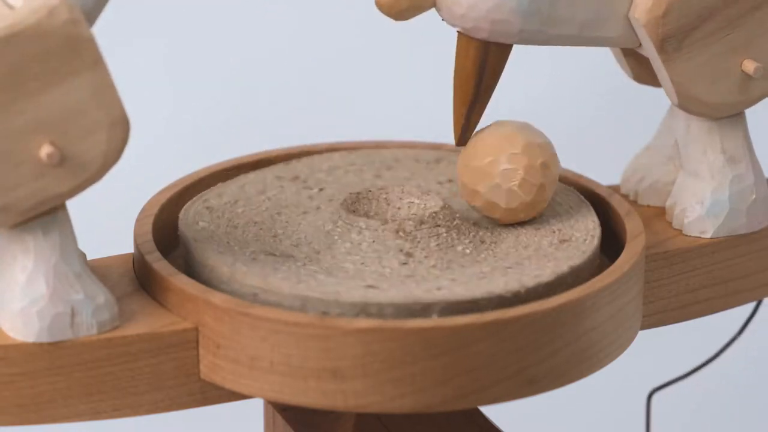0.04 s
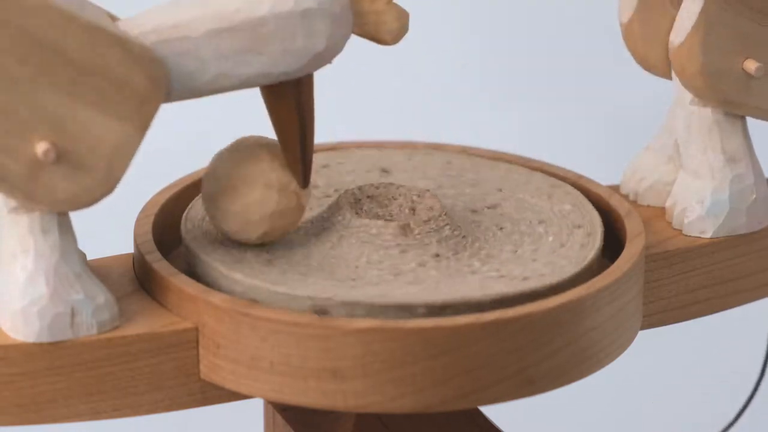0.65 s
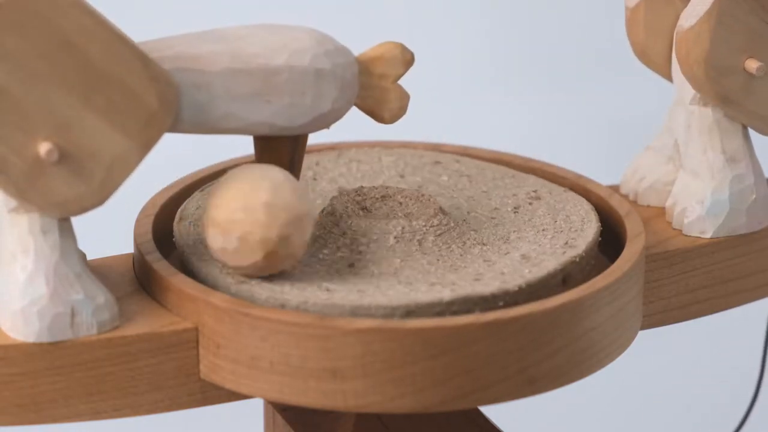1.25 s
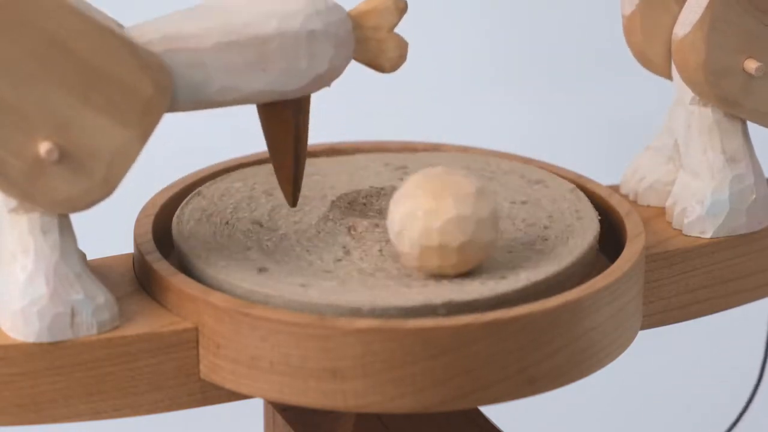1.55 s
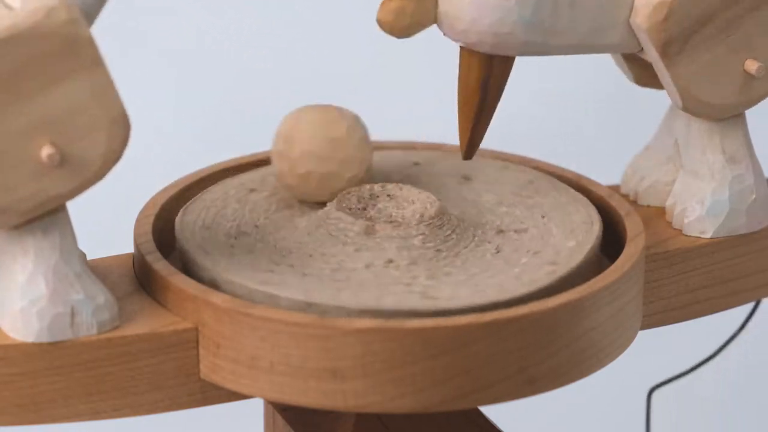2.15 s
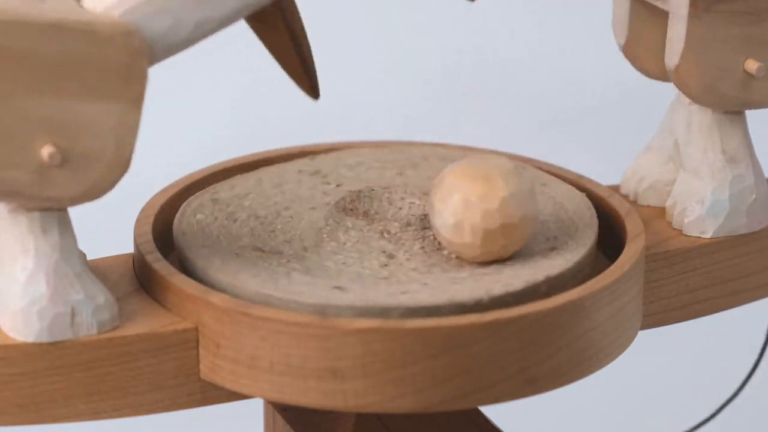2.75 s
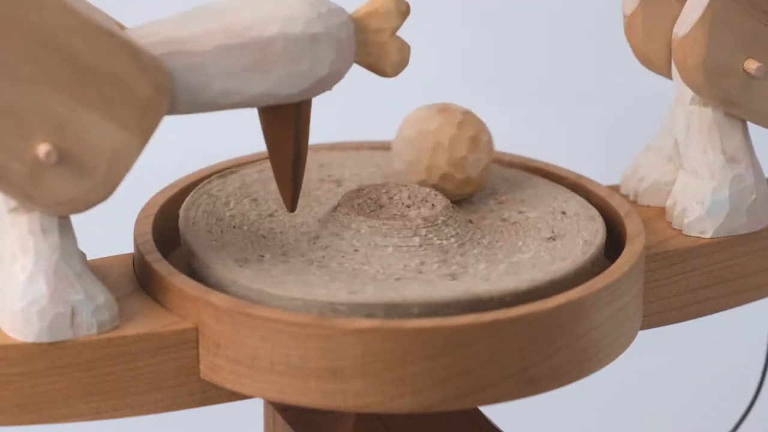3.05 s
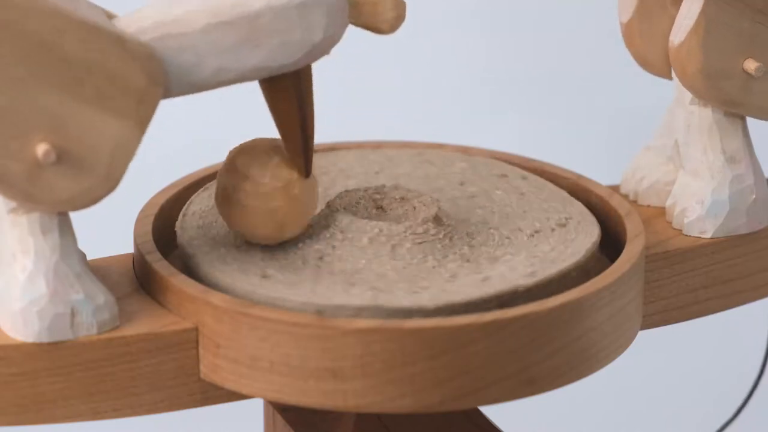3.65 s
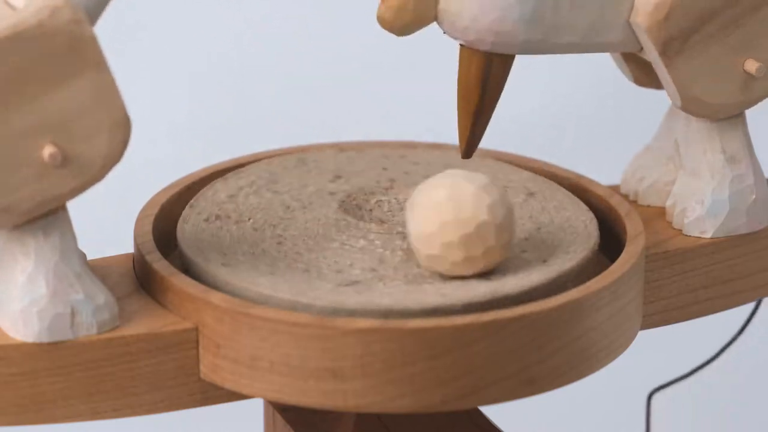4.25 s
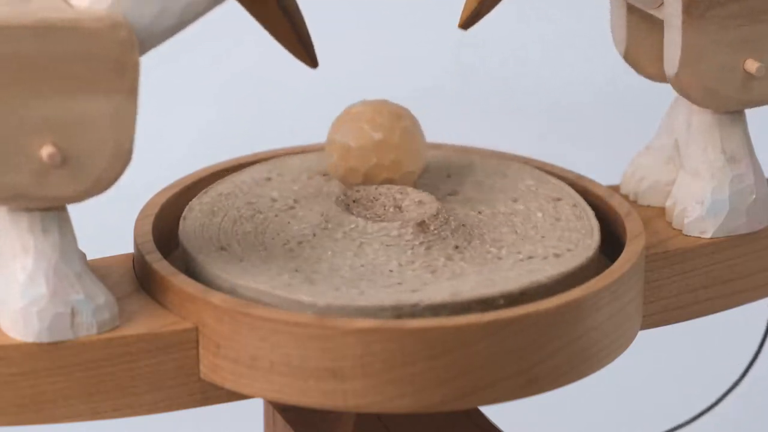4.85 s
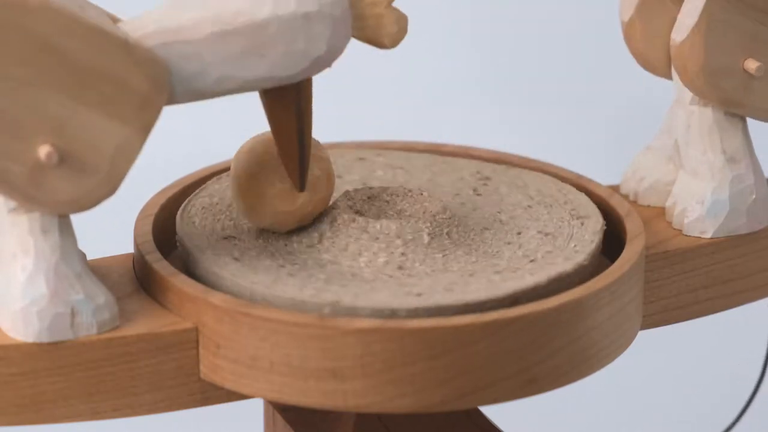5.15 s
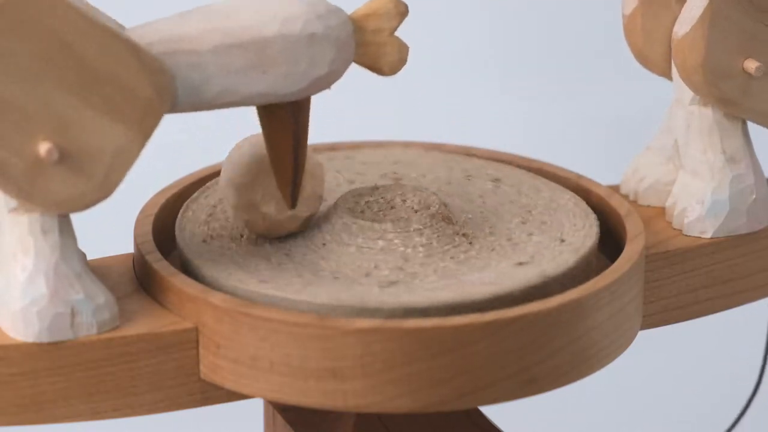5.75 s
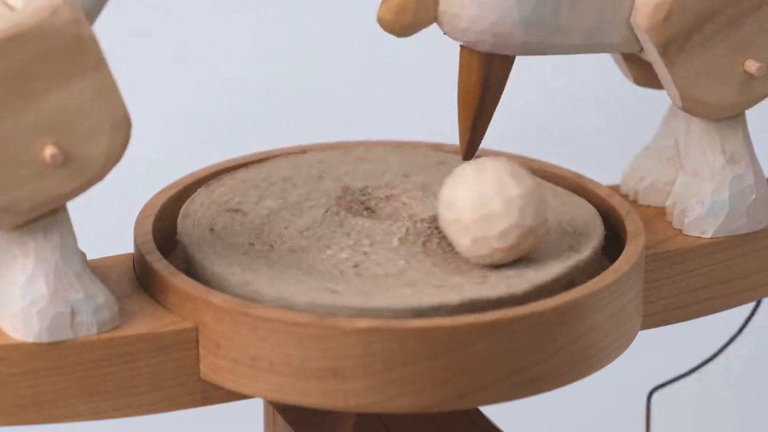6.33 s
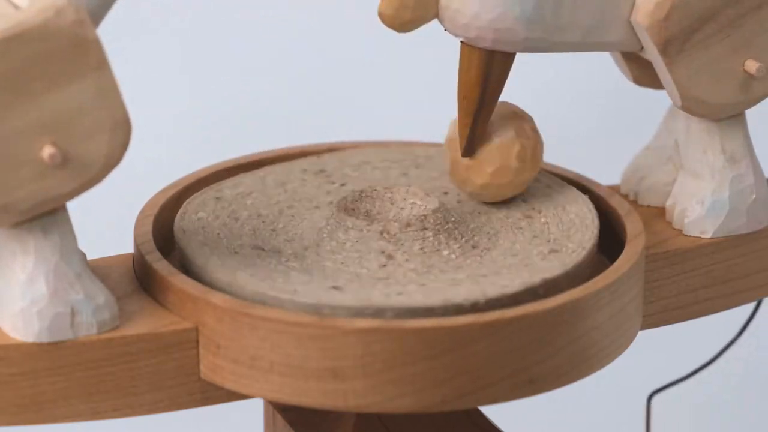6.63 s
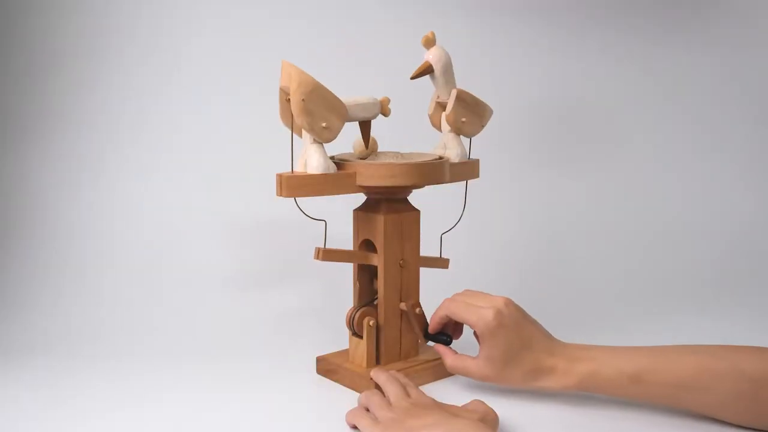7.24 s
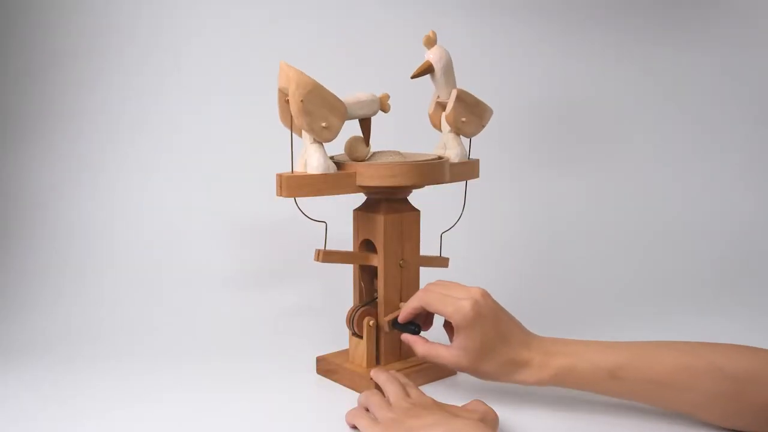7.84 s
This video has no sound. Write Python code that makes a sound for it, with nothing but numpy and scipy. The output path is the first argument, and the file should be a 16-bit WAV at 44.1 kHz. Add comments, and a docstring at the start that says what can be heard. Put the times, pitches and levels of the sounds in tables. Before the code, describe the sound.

Wooden beaks on a hand-cranked toy click against a wooden ball and scrape grit about once a second, with knocking levers and low hum.

```python
"""A soft knock over a low hum, then a flurry of wooden clicks: a hand-cranked automaton in a small room,
close to a stereo pair of microphones and a little to the right. Two carved birds take turns to peck
at a faceted wooden ball on a gritty dish. About once a second a beak drags through the grit and clicks
against the ball; cams and levers knock in the frame, the wire linkages ring faintly, the hollow base
booms, and the works rumble with the load of each stroke."""
import sys
import numpy as np
from scipy import signal
from scipy.io import wavfile
from scipy.ndimage import uniform_filter1d, map_coordinates

SR = 44100
rng = np.random.default_rng(int(sys.argv[2]) if len(sys.argv) > 2 else 0)


def transcribe(u):
    """Save the signal u as a 16-bit wav file named by the first command-line argument.

    u: samples, shape (n,) or (channels, n), limited to [-1, 1]; the rate is SR.
    q: integer samples, one column per channel.
    """
    v = np.clip(np.atleast_2d(u).T, -1, 1)
    q = np.round(v * 32767).astype(np.int16)
    wavfile.write(sys.argv[1], SR, q)


N = 352359
TIME = np.arange(N) / SR

# Room tone, and the rubbing of the works. Each row: frequency in Hz, relative spectral density in dB.
AIR_SPECTRUM = [(30, -26), (42, 4), (55, 3), (77, -3), (110, -5), (155, -12), (320, -6), (600, -18.5),
                (950, -16), (1400, -22.5), (2200, -28.5), (3200, -25.5), (6500, -29.5), (15000, -34)]
RUB_SPECTRUM = [(110, -1), (170, 1.5), (330, -3), (550, 1), (950, -2.5), (1300, -7.5), (1700, -9.5),
                (2500, -10.5), (4000, -28), (8000, -48)]
# Mains hum and a thin whine. Each row: frequency in Hz, level in dB.
HUM_TONES = [(49, -73), (100, -69), (15698, -81)]
# Diffuse sound at the two microphones. Each row: frequency in Hz, left-right correlation.
MIC_LIKENESS = [(40, .8), (120, .88), (350, .95), (1000, .87), (3000, .55), (6000, .35), (14000, .1)]
# The room's decay. Each row: frequency in Hz, seconds to fall by 60 dB.
ROOM_DECAY = [(80, 0.067), (260, 0.32), (700, 0.42), (2000, 0.4), (5000, 0.44), (14000, 0.26)]
# The room's strength. Each row: frequency in Hz, reverberant over direct level in dB.
ROOM_LEVELS = [(80, 9.5), (300, -0.5), (1000, -2), (2000, -6.5), (3200, -7), (6000, -5), (14000, -7.5)]
# Resonances of the parts. Each row: frequency in Hz, width in Hz, relative gain in dB.
BASE_MODES = [(87.8, 6.5, 7.5), (99.8, 17.6, -3.5), (170, 34, -5), (219, 56, -11.5)]
SWISH_MODES = [(990, 670, -5), (1740, 370, 0.5), (2290, 800, -11), (4200, 1100, -17)]
FRAME_MODES = [(177.5, 15, -2), (238, 120, -6), (317.6, 56, 2), (444, 26, -2), (496, 54, -7),
               (634, 110, -4.5), (826, 330, -9.5), (962, 65, 1)]
LEVER_MODES = [(694, 107, -6.5), (935, 55, 3.5), (1220, 143, -1.5), (1370, 130, -6), (1605, 110, 0),
               (2060, 710, -11), (2540, 180, -5), (3310, 590, -13.5)]
WIRE_MODES = [(3060, 2.9, -6), (3260, 1.36, -0.5), (3400, 1.8, -12.5), (3368, 3.8, -1), (6000, 2.6, -6),
              (5500, 2.6, -16), (7440, 4, -2), (8800, 4, -11)]
GRIT_MODES = [(5220, 960, -2.5), (7360, 330, 1.5), (8760, 560, 1.5), (9970, 550, 2.5), (11070, 1550, 0),
              (12480, 2170, 0.5), (13920, 1200, 2), (15100, 1300, -34)]
BALL_MODES = [(1560, 470, -15.5), (2343, 72, -4.5), (2560, 82, -5.5), (3013, 167, 3), (3224, 133, 6.5),
              (3429, 85, 3), (4010, 250, -15), (4960, 135, -7.5), (5490, 180, -5), (7300, 1200, -17.5)]
# Levers landing on cams. Each row: start in seconds, relative clack and thump levels in dB,
# nominal contact length in seconds.
CAM_KNOCKS = [(0.2147, -50, -37, 0.0049), (0.285, -49.5, -57, 0.0057), (0.4755, -47, -50, 0.0065),
              (0.621, -44.5, -46, 0.0083), (0.6846, -36, -42, 0.0064), (1.231, -50.5, -59.5, 0.0042),
              (1.746, -59, -47, .006), (1.807, -48.5, -37, 0.013), (1.894, -48.5, -46, 0.0071),
              (2.1008, -34, -44, 0.012), (2.1248, -46, -40.5, 0.0038), (2.698, -68, -47, 0.011),
              (2.881, -41, -50, 0.017), (2.996, -44, -46, 0.015), (3.4145, -45, -32, 0.0065),
              (3.5484, -53.5, -52, 0.0083), (3.605, -49.5, -56, 0.0047), (4.0547, -38, -52, 0.0048),
              (4.136, -32.5, -37, 0.0148), (4.186, -36.5, -52, 0.011), (4.469, -50, -49, 0.0098),
              (4.661, -47, -48.5, 0.0083), (5.029, -45, -59, 0.006), (5.213, -45, -58, 0.0063),
              (5.747, -54, -78, 0.0077), (6.0323, -46.5, -56, 0.012), (6.233, -37.5, -53, 0.006),
              (6.2545, -42.5, -39.5, 0.0067), (6.2945, -39.5, -34, 0.0068), (6.482, -46.5, -66, 0.0052),
              (6.991, -49.5, -55, 0.011), (7.14, -51, -47.5, 0.0043), (7.236, -42.5, -50, 0.0056),
              (7.327, -41.5, -51, 0.0022), (7.455, -47, -59, 0.0052), (7.771, -58, -59, 0.011)]
# A beak ploughing through the grit. Each row: start, pressing time and easing time in seconds,
# relative levels in dB of the hiss and of the loaded works.
BEAK_STROKES = [(0.532, 0.17, 0.12, -51.5, -42.5), (1.992, 0.12, 0.075, -53.5, -46),
                (2.728, .17, 0.19, -53, -45.5), (4.02, 0.11, 0.086, -52, -44.5),
                (4.908, 0.12, .17, -53, -46.5), (6.054, 0.2, .12, -49.5, -45),
                (7.018, .15, 0.22, -52, -47.5)]
# A beak hitting the ball. Each row: start in seconds, relative ring and crunch levels in dB,
# nominal contact length in seconds.
BEAK_CLICKS = [(0.343, -34, -56, .0036), (0.459, -60, -55, 0.0065), (0.485, -48, -52, 0.0054),
               (0.5015, -37, -45.5, 0.012), (0.5177, -34, -55, 0.0064), (0.5385, -38, -45.5, 0.0057),
               (0.561, -36, -51, 0.0027), (0.5893, -18.5, -37, .0058), (0.6774, -52, -36.5, 0.0044),
               (0.7183, -54, -43, 0.011), (0.7763, -21, -39.5, 0.0028), (1.773, -37, -60, 0.0035),
               (1.7986, -34.5, -56.5, 0.0041), (1.892, -30.5, -47, 0.0063), (1.908, -52, -47.5, 0.0052),
               (2.0017, -33, -47, 0.0078), (2.081, -26, -39, 0.011), (2.1044, -23.5, -35, 0.0034),
               (2.1736, -35.5, -41.5, 0.003), (2.594, -31, -54.5, 0.003), (2.746, -53, -47, 0.003),
               (2.7664, -34.5, -42, 0.014), (2.8026, -29.5, -42, 0.0042), (2.828, -27.5, -59, 0.0058),
               (2.8464, -34.5, -45, 0.026), (2.8805, -17.5, -35, 0.0034), (2.978, -51, -43.5, 0.0054),
               (3.01, -53, -40.5, 0.0044), (3.056, -24, -43.5, 0.0029), (3.8602, -26.5, -55, 0.0052),
               (3.884, -50, -39.5, 0.005), (3.9697, -47, -48.5, 0.0053), (4.0226, -30.5, -46.5, .0064),
               (4.073, -38, -44.5, 0.0086), (4.126, -37, -40, 0.0076), (4.19, -39, -39, 0.0097),
               (4.6547, -45, -48, 0.022), (4.736, -42, -43.5, 0.0046), (4.9345, -36.5, -49, 0.011),
               (4.9677, -28.5, -40, 0.0071), (5.003, -31, -40.5, 0.008), (5.023, -18.5, -39.5, 0.0044),
               (5.147, -39.5, -39.5, 0.0067), (5.169, -33, -47, 0.0067), (5.302, -40.5, -61, .004),
               (5.9383, -38.5, -66, 0.0082), (6.014, -37.5, -51, 0.009), (6.0296, -44, -39, 0.0082),
               (6.081, -38, -45, 0.0026), (6.1305, -56, -50, 0.0044), (6.1683, -26, -41, 0.0099),
               (6.188, -28, -42.5, 0.0054), (6.24, -48, -34, 0.0065), (6.2543, -19, -42, 0.007),
               (6.3044, -56, -40.5, 0.022), (6.359, -27.5, -41.5, 0.0038), (6.8475, -36, -54, 0.0027),
               (7.012, -41.5, -56, 0.003), (7.04, -40, -46, 0.0093), (7.0806, -29.5, -37, 0.007),
               (7.1259, -20.5, -44, 0.0033), (7.245, -46, -43.5, 0.0078), (7.3085, -22.5, -48, 0.0031),
               (7.38, -53, -59, 0.0025), (7.397, -37, -44.5, 0.0013)]


def from_db(db):
    """Decibels to gain."""
    return 10 ** (np.asarray(db) / 20)


def unit_rms(x):
    """Scale to unit rms."""
    return x / np.sqrt(np.mean(x ** 2) + 1e-20)


def at_hz(points, hz):
    """Read a table on a log-frequency axis."""
    points = np.array(points)
    return np.interp(np.log(hz), np.log(points[:, 0]), points[:, 1])


def drift(rate_hz):
    """A random wander of unit rms, mostly slower than the given rate."""
    pole = np.exp(-80 * np.pi * rate_hz / SR)
    noise = rng.standard_normal(N // 40 + 2002)   # one value per 40 samples
    slow = signal.lfilter([1], [1, -2 * pole, pole * pole], noise)[2000:]
    return np.interp(np.arange(N) / 40, np.arange(len(slow)), unit_rms(slow))


def resonate(force, modes):
    """Parallel resonances of alternating sign."""
    out = 0
    for k, (hz, width, db) in enumerate(modes):
        r = np.exp(-np.pi * width / SR)
        poles = [1, -2 * r * np.cos(2 * np.pi * hz / SR), r * r]
        ring = signal.lfilter([1, 0, -1], poles, force + 1e-18)
        out = out + (-1) ** k * from_db(db) * (1 - r * r) / 2 * ring
    return out


def soften(x, top_hz):
    """A yielding contact passes little above its top frequency."""
    return signal.sosfilt(signal.butter(2, top_hz, fs=SR, output="sos"), x + 1e-18)


def diffuse_bands(size):
    """Yield (Hz, stereo noise) by half octaves: the microphones agree in the bass, hardly in the treble."""
    edges = 23 * 2 ** np.arange(0, 9.6, .5)
    white = rng.standard_normal((2, 2, size + SR // 2))
    for k, (low, high) in enumerate(zip(edges, edges[1:])):
        band = signal.butter(2, [low, high], "band", fs=SR, output="sos")
        mid, side = signal.sosfilt(band, white[k % 2])[:, -size:]
        hz = np.sqrt(low * high)
        alike = np.clip(at_hz(MIC_LIKENESS, hz), -1, 1)
        yield hz, np.sqrt((1 + alike) / 2) * mid + np.sqrt((1 - alike) / 2) * side * [[1], [-1]]


def slips(size, spread_db):
    """Force of tiny slips; each reaches the left and right microphone with a strength of its own."""
    return rng.standard_normal(size) * from_db(spread_db * rng.standard_normal((2, size)))


def strike(contacts, modes, column, impact_db, rise_s, stretch, spread_db, vary_db, detune, size=3072):
    """Each contact is one impact and a chatter of slips ringing the modes, at the column's level."""
    out, t = np.zeros((2, N + size)), TIME[:size]
    impulse = signal.unit_impulse(size)
    rings = np.array([(-1) ** k * resonate(impulse, [mode]) for k, mode in enumerate(modes)])
    for row in contacts:
        start, length_s = int(row[0] * SR), max(stretch * row[-1], 1e-3)
        pressure = (1 - np.exp(-(t / rise_s) ** 2)) * np.exp(-(t / length_s) ** 2)
        force = pressure * slips(size, spread_db)
        force = force / np.sqrt(np.sum(force ** 2, axis=1).mean())
        force[:, np.argmax(pressure)] += from_db(impact_db)
        # the point of contact shifts the pitch a little and decides how each mode radiates to either side
        pitch = np.exp(detune * rng.uniform(-1.3, 1))
        body = from_db(vary_db * rng.standard_normal((2, len(modes)))) @ rings
        body = np.array([map_coordinates(side, [pitch * np.arange(size)], order=3) for side in body])
        sound = signal.fftconvolve(force, body, axes=1)[:, :size]
        loudest = np.sqrt(uniform_filter1d(np.mean(sound ** 2, axis=0), 132).max())   # rms over 3 ms
        out[:, start:start + size] += from_db(row[column]) * sound / loudest
    return out[:, :N]


def room_tone(air_db):
    """Still air all round the microphones, with faintly wavering mains hum and a thin whine."""
    air = unit_rms(sum(from_db(at_hz(AIR_SPECTRUM, hz)) * noise for hz, noise in diffuse_bands(N)))
    hum = sum(np.sqrt(2) * from_db(db) * np.sin(2 * np.pi * hz * TIME + .5 * drift(1.3))
              for hz, db in HUM_TONES)
    return from_db(air_db) * air + hum


def reflections(source, build_s=0.006):
    """Dense reflections off the near walls build up quickly and die band by band."""
    t = TIME[:SR * 3 // 4]
    response = 0
    for hz, noise in diffuse_bands(len(t)):
        fade = from_db(-60 * t / at_hz(ROOM_DECAY, hz)) * (1 - np.exp(-(t / build_s) ** 2))
        response = response + from_db(at_hz(ROOM_LEVELS, hz)) * noise * fade / np.sqrt(np.sum(fade ** 2))
    return signal.fftconvolve(source[None], response, axes=1)[:, :N]


def base_boom(kick_db, side_db, idle_db=-64, rise_s=0.026, t60_s=0.86):
    """The hollow base booms softly all the time and swells after every knock."""
    kicks = np.zeros(N)
    for start, _, thump_db, _ in CAM_KNOCKS:
        kicks[int(start * SR)] = from_db(kick_db + 0.63 * thump_db) ** 2   # partly follows the thump
    t = TIME[:SR]
    swell = (1 - np.exp(-t / rise_s)) * from_db(-60 * t / t60_s)
    power = from_db(idle_db) ** 2 + np.abs(signal.fftconvolve(kicks, swell ** 2)[:N])
    booms = resonate(rng.standard_normal((2, N)), BASE_MODES)
    mid, side = booms / np.sqrt(uniform_filter1d(booms ** 2, SR // 8))   # held at an even level
    return np.sqrt(power) * (mid + from_db(side_db) * side * [[1], [-1]])


def works_rumble(gain_db, judder_db, idle_db=-57.5, rise_db_per_s=76, fall_db_per_s=61.5, facet_hz=17):
    """Shafts rub and the faceted ball rolls unevenly, louder as each stroke loads the works."""
    power = from_db(idle_db) ** 2   # the crank turning freely
    for start, press, _, _, load_db in BEAK_STROKES:
        since_peak = TIME - (start + press)
        below_db = np.maximum(-rise_db_per_s * since_peak, fall_db_per_s * since_peak)
        power = power + from_db(load_db - below_db) ** 2
    facets = drift(facet_hz)   # half of the unevenness is shared by all bands
    rub = sum(from_db(at_hz(RUB_SPECTRUM, hz) + judder_db * (facets + drift(facet_hz)) / 2) * noise
              for hz, noise in diffuse_bands(N))
    return from_db(gain_db) * np.sqrt(power) * unit_rms(rub)


def facet_taps(tap_db, scatter_db, length_s, count=24):
    """The rolling ball tips from facet to facet with tiny taps."""
    taps = [(start, tap_db + scatter_db * rng.standard_normal(), length_s)
            for start in rng.uniform(0, TIME[-1], count)]
    return strike(taps, LEVER_MODES, column=1, impact_db=-8.0, rise_s=0.00154,
                  stretch=1.0, spread_db=0.0, vary_db=11.5, detune=0.11)


def swish(peak_s, half_length_s, level_db):
    """Wood brushes lightly over wood once, swelling and fading."""
    swell = np.exp(-((TIME - peak_s) / half_length_s) ** 4)
    return from_db(level_db) * swell * unit_rms(resonate(slips(N, spread_db=6.0), SWISH_MODES))


def wires(shake, gain_db, slack_db):
    """The linkages sit loosely in their holes and ring mainly when a shake takes up the slack."""
    slack = from_db(slack_db)
    return from_db(gain_db) * resonate(shake - slack * np.tanh(shake / slack), WIRE_MODES)


def knocks(clack_gain_db, thump_gain_db):
    """A lever lands on its cam with a clack; the heavier frame answers with one round thump."""
    clack = strike(CAM_KNOCKS, LEVER_MODES, column=1, impact_db=-8.5, rise_s=0.00193,
                   stretch=1.52, spread_db=3.0, vary_db=-1.0, detune=0.071)
    thump = strike(CAM_KNOCKS, FRAME_MODES, column=2, impact_db=15.0, rise_s=0.001985,
                   stretch=0.85, spread_db=7.5, vary_db=2.1, detune=0.0042)
    clack, thump = soften(clack, top_hz=4400), soften(thump, top_hz=810)
    return from_db(clack_gain_db) * clack + from_db(thump_gain_db) * thump


def drags(grit_gain_db, ball_gain_db, lever_gain_db, judder_db, light_touch_db=-12):
    """The beak sticks and slips over the grit, which also sets the ball and levers ringing."""
    force = slips(N, spread_db=8.5) * from_db(judder_db * drift(71))
    parts = [(grit_gain_db, GRIT_MODES), (ball_gain_db, BALL_MODES), (lever_gain_db, LEVER_MODES)]
    scrape = sum(from_db(db) * unit_rms(resonate(force, modes)) for db, modes in parts)
    pressure = 0
    for start, press, ease, hiss_db, _ in BEAK_STROKES:
        t = TIME - start
        swell_db = np.interp(t, [0, press, press + ease], [light_touch_db, 0, light_touch_db])
        pressure = pressure + from_db(hiss_db + swell_db) * (t > 0) * (t < press + ease)
    return pressure * scrape


def snags(ring_db, crunch_db, scatter_db, length_s, count=4):
    """Small contacts with coarse grains, strewn along each stroke at levels relative to its hiss."""
    rows = []
    for start, press, ease, hiss_db, _ in BEAK_STROKES:
        times = start + (press + ease) * (np.arange(count) + rng.random(count)) / (count + 1)
        levels = hiss_db + scatter_db * rng.standard_normal((count, 2)) + [ring_db, crunch_db]
        rows += [(when, ring, crunch, length_s) for when, (ring, crunch) in zip(times, levels)]
    return rows


def rebounds(above_db, delay_s, length_s):
    """The ball springs back from the hardest clicks and touches the beak once more."""
    return [(start + delay_s, ring, crunch, length_s)
            for start, ring, crunch, _ in BEAK_CLICKS if ring > above_db]


def pecks(ring_gain_db, crunch_gain_db):
    """Beak on ball: hard wood rings at once near 3 kHz, while the crunch of grit swells and lasts longer."""
    contacts = BEAK_CLICKS + rebounds(above_db=-19, delay_s=.006, length_s=.004)
    contacts += snags(ring_db=3.0, crunch_db=4.5, scatter_db=-1.0, length_s=0.0081)
    ring = strike(contacts, BALL_MODES, column=1, impact_db=-9.0, rise_s=0.001037,
                  stretch=1.05, spread_db=1.0, vary_db=4.5, detune=0.0053)
    crunch = strike(contacts, GRIT_MODES, column=2, impact_db=-40.0, rise_s=0.0027,
                    stretch=1.53, spread_db=8.5, vary_db=4.0, detune=0.034)
    return from_db(ring_gain_db) * ring + from_db(crunch_gain_db) * crunch


def scene(left_lag_s=1.2e-5):
    """The automaton stands close and a little to the right, so the left microphone hears it later."""
    beaks = pecks(ring_gain_db=-8.0, crunch_gain_db=5.0)
    beaks += drags(grit_gain_db=-1.0, ball_gain_db=0.0, lever_gain_db=-12.5, judder_db=3.0)
    toy = beaks + wires(beaks, gain_db=-1.0, slack_db=-31)
    toy += knocks(clack_gain_db=1.0, thump_gain_db=3.0)
    toy += facet_taps(tap_db=-69.0, scatter_db=7.5, length_s=.005)
    toy += swish(peak_s=1.496, half_length_s=.065, level_db=-59.5)
    left = map_coordinates(toy[0], [(TIME - left_lag_s) * SR], order=3)
    at_mics = np.array([left, toy[1]]) + reflections(toy.mean(axis=0))
    rumble = works_rumble(gain_db=-3.0, judder_db=3.0) + base_boom(kick_db=-24.0, side_db=-7.0)
    return at_mics + rumble + room_tone(air_db=-59.5)


def record(dry):
    """The microphone signal is cut steeply above 16.3 kHz."""
    return signal.sosfilt(signal.ellip(10, .2, 80, 16300, fs=SR, output="sos"), dry)


dry = scene()
out = record(dry)
transcribe(out)
```